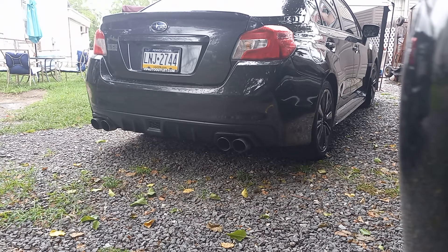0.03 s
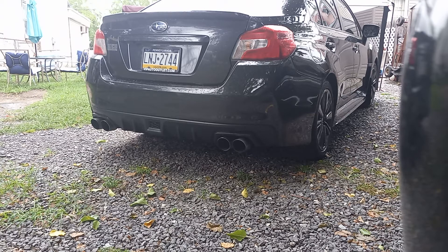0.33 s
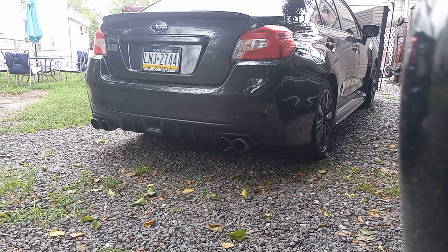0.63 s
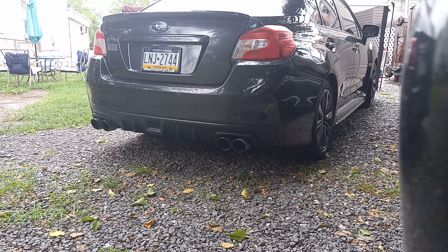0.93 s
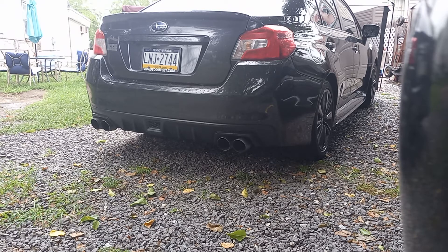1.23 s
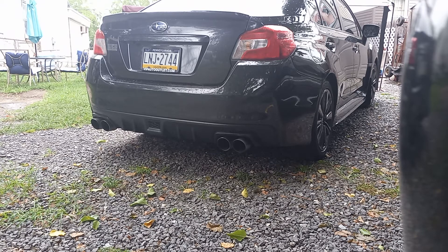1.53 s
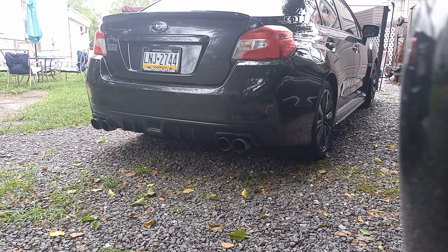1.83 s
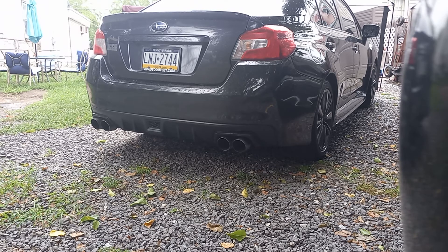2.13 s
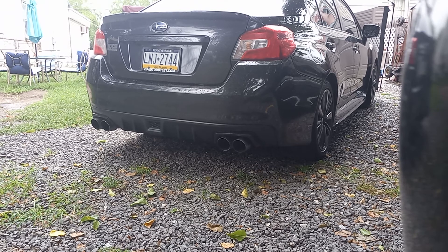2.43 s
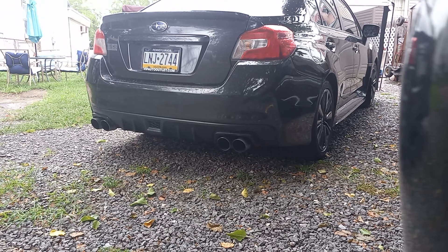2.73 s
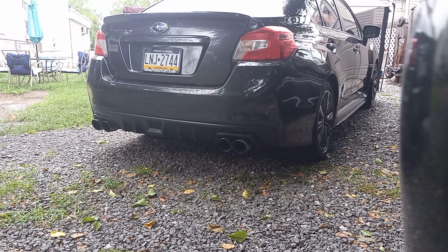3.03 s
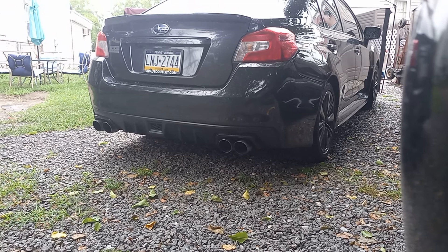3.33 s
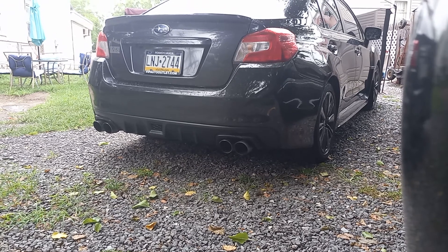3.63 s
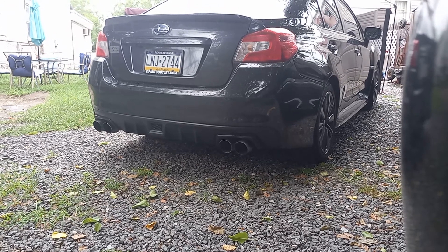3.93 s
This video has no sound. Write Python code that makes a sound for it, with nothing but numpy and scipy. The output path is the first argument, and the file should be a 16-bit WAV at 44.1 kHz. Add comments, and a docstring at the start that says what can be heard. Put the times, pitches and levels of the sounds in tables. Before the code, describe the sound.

A car engine idles with a deep, throbbing exhaust and a faint falling whine.

```python
"""A throbbing exhaust: a turbocharged four-cylinder car idles just after a start, a few metres away.
Each firing sends a pressure pulse and a puff of gas out of the tailpipes; the note changes colour
as the idle settles. A whine, probably the turbo, winds down. Behind it the engine bay clatters
and hisses, and a few faint ticks sound close by."""
import sys
import numpy as np
from scipy.fft import rfft, irfft, next_fast_len
from scipy.io import wavfile
from scipy.ndimage import map_coordinates

SR = 44100
rng = np.random.default_rng(int(sys.argv[2]) if len(sys.argv) > 2 else 0)


def dump(signal):
    """Clip the signal to [-1, 1] and save it as 16-bit WAV at the path in sys.argv[1]."""
    limited = np.clip(np.atleast_2d(signal).T, -1, 1)
    pcm = np.round(limited * 32767).astype(np.int16)
    wavfile.write(sys.argv[1], SR, pcm)


N = 176400
TIME_S = np.arange(N) / SR
SIDES = np.array([[.5], [-.5]])  # splits a left-minus-right value over both channels


def amp(db):
    """Decibels to gain."""
    return 10 ** (np.asarray(db) / 20)


def unit(x):
    """Scale to rms 1."""
    return x / np.sqrt(np.mean(x ** 2) + 1e-20)


def along(points, hz):
    """Read (freq_hz, value) rows on a log frequency axis."""
    freqs_hz, values = np.transpose(points)
    return np.interp(np.log(hz + 1), np.log(freqs_hz + 1), values)


def curve(rows):
    """One value per sample from (time_s, value) rows."""
    return np.interp(TIME_S, *np.transpose(rows))


def wobble(rate_hz):
    """A smooth random curve with rate_hz knots a second."""
    return map_coordinates(rng.standard_normal(4096), [TIME_S * rate_hz], mode="mirror")


def filtered(x, response):
    """Filter x by response(hz)."""
    size = next_fast_len(N + SR // 2)
    return irfft(rfft(x, size) * response(np.fft.rfftfreq(size, 1 / SR)), size)[..., :N]


def per_firing(firings):
    """A new random value for each firing, smoothly joined."""
    return map_coordinates(rng.standard_normal(512), [firings + 1])


def throb(firings, depth, delay_firings):
    """A gain that swells once per firing."""
    return unit(1 + depth * np.cos(2 * np.pi * (firings - delay_firings)))


# time_s, rate_hz (four firings per engine cycle)
FIRING_RATE = [(0, 61.3), (.2, 60.9), (.42, 60.3), (.9, 61.07), (1.25, 61.3), (1.6, 60.8), (2.2, 59.65),
               (2.45, 58.97), (3.2, 58.37), (4, 58.47)]
# cycle_harmonic, fast_idle_db, settled_idle_db
EXHAUST_PARTIALS = [(4, -16, -16.5), (5, -42, -48), (6, -33, -37.5), (7, -47, -48), (8, -22, -25),
                    (9, -63.5, -56.5), (10, -44.5, -54), (11, -42, -42.5), (12, -30, -24.5),
                    (13, -37.5, -41), (14, -63.5, -53), (15, -44.5, -51.5), (18, -44.5, -44),
                    (19, -46.5, -52), (20, -43.5, -38), (21, -52.5, -61), (22, -43, -47), (24, -42.5, -34),
                    (25, -74, -56.5), (26, -48.5, -49), (28, -51.5, -41), (32, -52.5, -47.5),
                    (34, -59, -52), (36, -49.5, -55.5), (37, -62.5, -54.5), (38, -60, -58.5),
                    (40, -57, -42.5), (44, -55, -55), (45, -66, -54)]
# time_s, gain_db
BOOM_GAIN = [(0, 0), (.33, -5), (.55, -3), (1, -1.5), (1.5, -0.5), (2.2, 0), (4, 0)]
BURBLE_GAIN = [(0, -5), (.2, -1), (.45, 1.5), (.9, -1.5), (1.5, 1), (2.3, 1.5), (3, 1), (4, -.7)]
# time_s, settled_share
BOOM_SETTLING = [(1.7, 0.025), (3.1, 0.97)]
BURBLE_SETTLING = [(1.55, 0), (2.35, 0.98)]
# freq_hz, left_minus_right_db
EXHAUST_BALANCE = [(60, -1.7), (120, -.2), (176, -4.5), (293, -4), (352, 5), (410, -2.7), (470, 0),
                   (585, 7.5), (700, 6)]
# freq_hz, left_lead_rad
EXHAUST_PHASE = [(60, .2), (120, .2), (176, .5), (293, 1), (352, .5), (470, .6), (600, 1.1)]
BURBLE_ABOVE_HZ = 230  # partials below form the boom
SMEAR_RAD, SMEAR_CENTRE_HZ = .822, 345.8
PULSE_LAG_RAD, SETTLE_LAG_RAD = .45, .65

def exhaust(firings):
    """Firing orders line up into one pulse per firing; unequal cylinders add the orders between."""
    firing_rad = 2 * np.pi * (firings + .0025 * per_firing(firings))
    boom = amp(curve(BOOM_GAIN)) * (1 + .03 * per_firing(firings)), curve(BOOM_SETTLING)
    burble = amp(curve(BURBLE_GAIN)) * (1 + .09 * per_firing(firings)), curve(BURBLE_SETTLING)
    early_rate_hz, settled_rate_hz = curve(FIRING_RATE)[:N // 2].mean(), FIRING_RATE[-1][1]
    out = np.zeros((2, N))
    for cycle_harmonic, fast_db, settled_db in EXHAUST_PARTIALS:
        order = cycle_harmonic / 4
        hz = order * settled_rate_hz
        band_gain, settled = burble if hz > BURBLE_ABOVE_HZ else boom
        if order % 1 == 0:
            drift_db = .5 * (1 - 1 / order) * wobble(3.78)
            lag_rad = SETTLE_LAG_RAD * settled * (order > 1)
        else:
            drift_db = 1.5 * wobble(3.17)
            lag_rad = rng.uniform(0, 2 * np.pi)
        if hz > BURBLE_ABOVE_HZ:  # the muffler smears each pulse's overtones in time
            lag_rad += SMEAR_RAD * ((hz - SMEAR_CENTRE_HZ) / settled_rate_hz) ** 2
        elif order > 1:  # low overtones follow only part of the boom's rise
            lag_rad += PULSE_LAG_RAD
            drift_db -= .26 * curve(BOOM_GAIN)
        level = amp(fast_db) * (1 - settled) + amp(settled_db) * settled
        gain = band_gain * amp(drift_db + swell_db(order * early_rate_hz))
        pan = amp(SIDES * along(EXHAUST_BALANCE, hz))
        wave = np.cos(order * firing_rad - lag_rad + SIDES * along(EXHAUST_PHASE, hz))
        out -= level * gain * pan * wave
    return np.sqrt(2) * out


# centre_s, half_length_s, gain_db, pitch_hz
EXHAUST_SWELLS = [(.3, 0.3, 5.5, 182), (0.64, 0.27, 4.5, 196), (0.063, 0.023, 18, 370), (0.2, 0.1, 12, 303),
                  (0.408, 0.05, 12.5, 303), (0.52, 0.27, 6.5, 362), (0.23, 0.2, 9, 668),
                  (0.9, 0.12, 10, 397), (1.65, .27, 11.5, 395), (1.85, 0.46, 11.5, 662),
                  (2.1, 0.35, 5.5, 200.4), (3.12, 0.07, -2, 381), (4.1, .04, 6, 250)]

def swell_db(hz, width_hz=9.2):
    """Narrow exhaust resonances come and go, mostly lifting the orders near their pitch."""
    return sum(db * np.exp(-((TIME_S - centre_s) / half_s) ** 2 - ((hz - pitch_hz) / width_hz) ** 2)
               for centre_s, half_s, db, pitch_hz in EXHAUST_SWELLS if abs(hz - pitch_hz) < 2 * width_hz)


# freq_hz, left_right_coherence
NOISE_COHERENCE = [(100, 0.91), (300, 0.55), (550, 0.22), (1100, 0.16), (2400, 0.49), (4000, 0.17),
                   (7000, 0.11)]

def rush(colour, left_lead_s):
    """Coloured, partly coherent stereo noise of rms 1 that arrives on the left first."""
    def mid_side_gains(hz):
        angle_rad = np.arccos(along(NOISE_COHERENCE, hz)) / 2
        return amp(along(colour, hz)) * [np.cos(angle_rad), np.sin(angle_rad)]

    mid, side = filtered(rng.standard_normal((2, N)), mid_side_gains)
    right = filtered(mid - side, lambda hz: np.exp(-2j * np.pi * hz * left_lead_s))
    return unit(np.array([mid + side, right]))


# time_s, level_db
PUFF_LEVEL = [(0, -39.5), (.25, -42.5), (.42, -49.5), (.7, -41.5), (.9, -40), (1.3, -41), (1.6, -37),
              (1.82, -35), (1.97, -41), (2.3, -38.5), (2.85, -43.5), (3.15, -33), (3.45, -42.5), (4, -40)]
RUMBLE_LEVEL = [(0, -43), (1.3, -40), (2.2, -37), (2.9, -40.5), (4, -41)]
# freq_hz, density_db
PUFF_SPECTRUM = [(150, -20), (245, -3), (300, -2.5), (395, 0.5), (440, -12.5), (495, -3), (545, -10),
                 (665, -9.5), (740, -13), (1100, -27), (3000, -62)]
RUMBLE_SPECTRUM = [(20, -18), (45, -10), (85, 6.5), (105, 8.5), (140, 4.5), (185, 13), (215, -7),
                   (400, -48)]

def puffs(firings, left_lead_s=.000315):
    """Each firing pushes a puff of turbulent gas out of the pipes, over a low rumble."""
    pulsing = throb(firings, depth=.28, delay_firings=.3)
    gas = amp(curve(PUFF_LEVEL)) * pulsing * rush(PUFF_SPECTRUM, left_lead_s)
    rumble = amp(curve(RUMBLE_LEVEL)) * rush(RUMBLE_SPECTRUM, left_lead_s)
    return gas + rumble


# time_s, pitch_hz
WHINE_GLIDE = [(0, 1900), (.25, 1662), (.42, 1528), (.6, 1424), (.8, 1343), (1, 1278), (1.3, 1205),
               (1.6, 1145), (2, 1080), (2.5, 1012), (3.2, 950), (4, 917)]
# time_s, drive_db
WHINE_DRIVE = [(0, -60), (.3, -55.5), (.6, -52), (.78, -51.5), (.97, -46), (1.12, -51), (1.38, -57),
               (1.6, -52.5), (1.9, -51), (2.2, -54.5), (2.55, -52), (3.1, -57.5), (4, -52.5)]
# offset_orders, relative_db
WHINE_SIDEBANDS = [(-2, -12), (-1, 1), (-.5, -9), (0, 0), (.5, -13), (1, -1.5)]
# freq_hz, gain_db
WHINE_RESONANCES = [(900, -5), (990, 3.5), (1085, 3), (1175, -2.5), (1222, 4), (1265, -0.5), (1370, 1),
                    (1550, -2.5)]

def whine(firings):
    """A rotor coasts down; the firings split its tone into sidebands that flare at resonances."""
    wander_hz = 7 + 70 * np.exp(-TIME_S / .35)  # rough while fast
    tone = np.zeros((2, N))
    for offset_orders, relative_db in WHINE_SIDEBANDS:
        pitch_hz = curve(WHINE_GLIDE) + wander_hz * wobble(120)
        cycles = np.cumsum(pitch_hz) / SR + offset_orders * firings + rng.random()
        left_lead_rad = 1.7 * wobble(7)
        drift_db = 1.5 * wobble(6.04)
        tone += amp(relative_db + drift_db) * np.sin(2 * np.pi * cycles + SIDES * left_lead_rad)
    return filtered(amp(curve(WHINE_DRIVE)) * unit(tone), lambda hz: amp(along(WHINE_RESONANCES, hz)))


# time_s, level_db
CLATTER_LEVEL = [(0, -51), (.6, -52.5), (1.3, -48), (1.9, -47), (3.1, -48), (4, -48)]
# freq_hz, density_db
CLATTER_SPECTRUM = [(300, -15), (730, 0.5), (820, 9), (945, -3.5), (1040, 2), (1380, -2), (1560, -11),
                    (1750, -5), (2050, -9), (2350, -8.5), (2750, -22.5), (4000, -33), (8000, -73)]

def clatter(firings, rough_db=1.5):
    """Muffled engine bay clatter in step with the firings."""
    level_db = curve(CLATTER_LEVEL) + rough_db * per_firing(firings)
    pulsing = throb(firings, depth=.15, delay_firings=.74)
    return amp(level_db) * pulsing * rush(CLATTER_SPECTRUM, left_lead_s=.00062)


# time_s, level_db
HISS_LEVEL = [(0, -61.5), (.4, -60.5), (1, -57.5), (1.6, -56), (4, -56.5)]
# freq_hz, density_db
HISS_LEFT = [(1000, 5.5), (2800, -1), (4200, 0), (5500, -3.5), (6300, -0.5), (7050, -3), (7700, -10.5),
             (8800, -13), (9700, -28), (11500, -18), (15500, -12)]
HISS_RIGHT = [(1000, -4), (2900, -0.5), (4500, -3), (5750, -3.5), (6250, 5.5), (6600, -3.5), (7000, 5),
              (7500, -5), (8300, -32), (15500, -35)]

def hiss():
    """Smooth engine bay hiss with its own colour on each side."""
    white = rng.standard_normal((2, N))
    coloured = filtered(white, lambda hz: amp([along(HISS_LEFT, hz), along(HISS_RIGHT, hz)]))
    return amp(curve(HISS_LEVEL)) * unit(coloured)


# start_s, relative_db, pitch_hz
TICK_EVENTS = [(.2655, -59, 14600), (.405, -63.5, 13100), (.544, -60.5, 12500), (.601, -58, 14800),
               (.618, -55, 15200), (.652, -62, 12600), (.661, -61, 8800), (1.667, -52, 5100)]

def ticks(gain_db=-5, t60_s=.025, width_hz=1800, left_minus_right_db=7):
    """Tiny bright clicks off to the left, each a fast-decaying band of noise."""
    out = np.zeros(N)
    for start_s, relative_db, pitch_hz in TICK_EVENTS:
        band = filtered(rng.standard_normal(N), lambda hz: 1 / np.hypot(1, 2 * (hz - pitch_hz) / width_hz))
        decay_db = 60 * np.abs(TIME_S - start_s) / t60_s
        out += amp(relative_db + gain_db - decay_db) * (TIME_S >= start_s) * unit(band)
    return out * amp(SIDES * left_minus_right_db)


def scene():
    """One count of firings drives the exhaust, puffs, clatter and whine; hiss and ticks run free."""
    first_firing_s = .0059
    firings = np.cumsum(curve(FIRING_RATE)) / SR - first_firing_s * FIRING_RATE[0][1]
    return exhaust(firings) + puffs(firings) + clatter(firings) + hiss() + whine(firings) + ticks()


def record(dry):
    """A steep low-pass removes the highest treble."""
    cutoff_hz, edge_hz = 15750, 100
    return filtered(dry, lambda hz: np.clip((cutoff_hz - hz) / edge_hz + .5, 0, 1))


dry = scene()
out = record(dry)
dump(out)
```